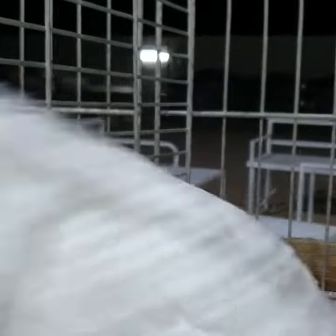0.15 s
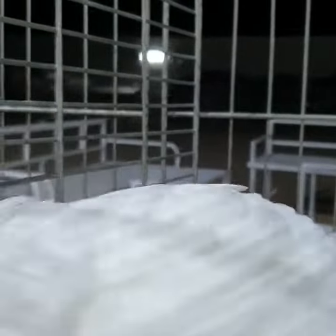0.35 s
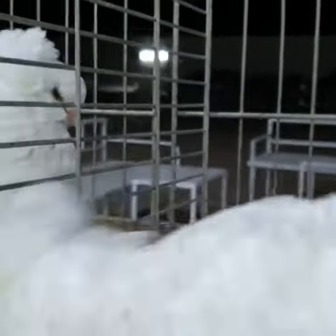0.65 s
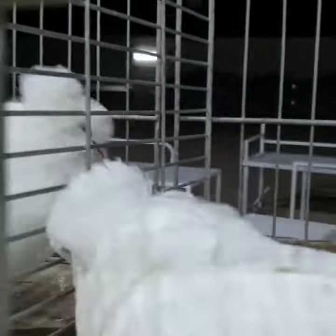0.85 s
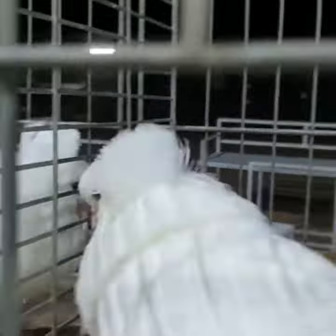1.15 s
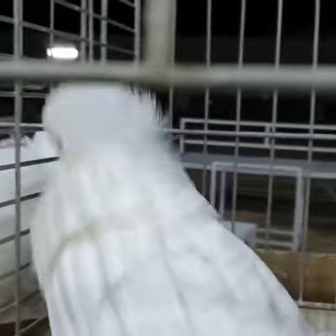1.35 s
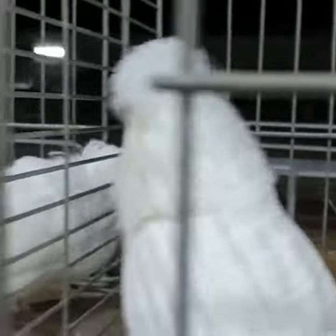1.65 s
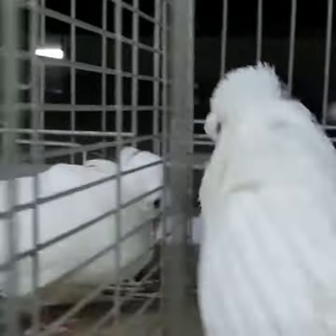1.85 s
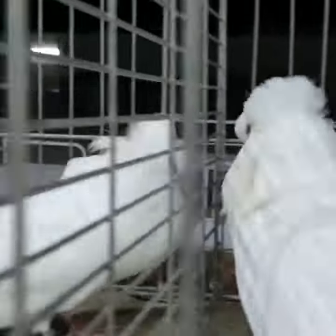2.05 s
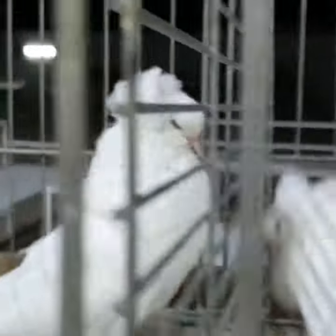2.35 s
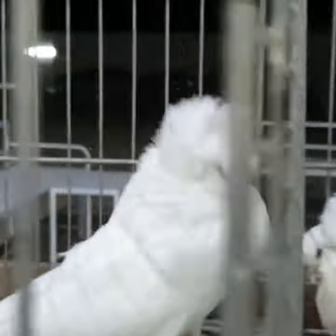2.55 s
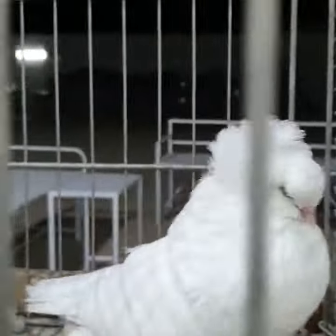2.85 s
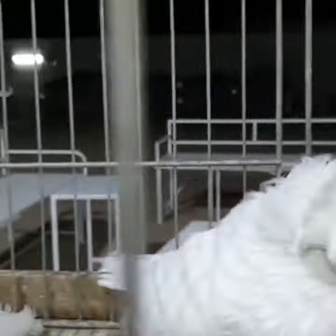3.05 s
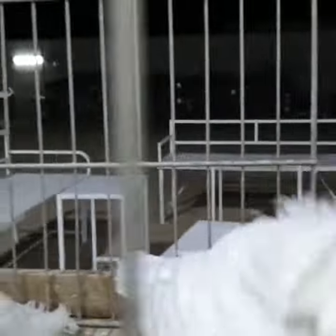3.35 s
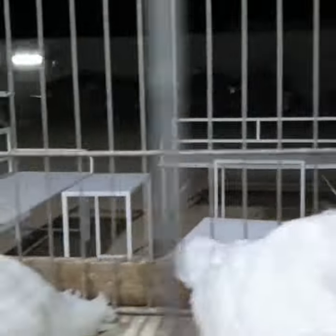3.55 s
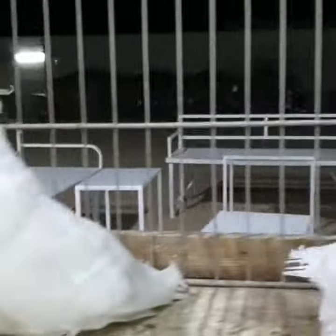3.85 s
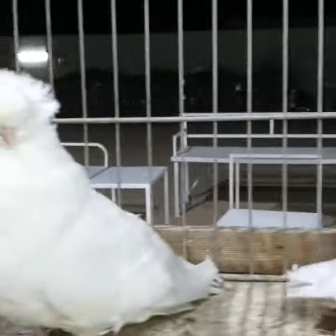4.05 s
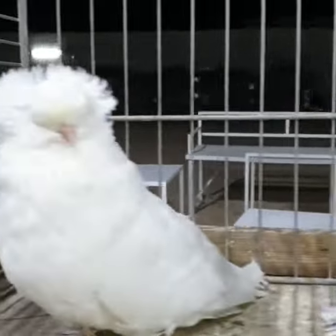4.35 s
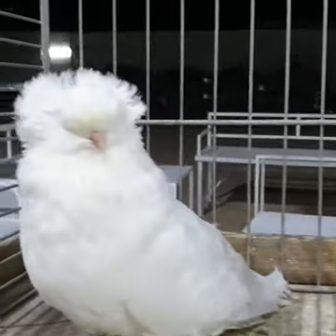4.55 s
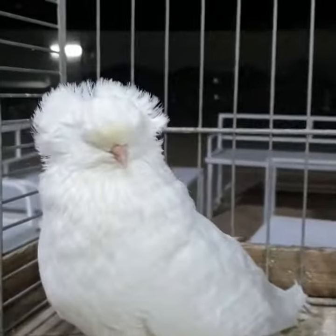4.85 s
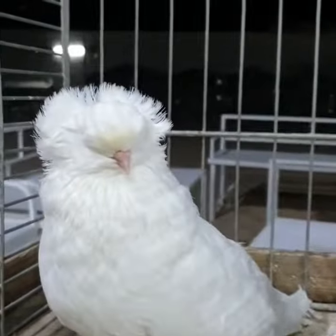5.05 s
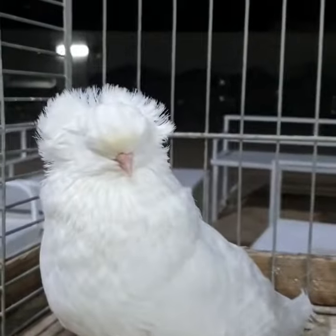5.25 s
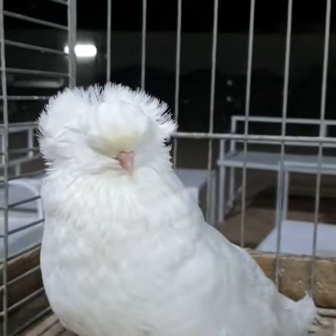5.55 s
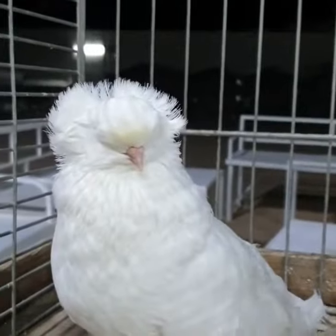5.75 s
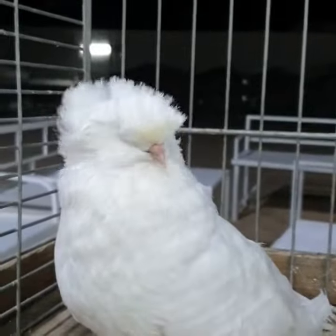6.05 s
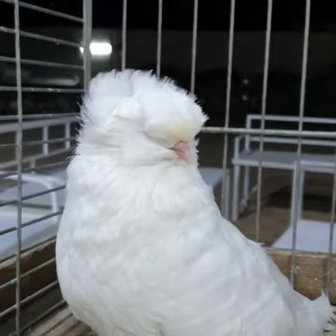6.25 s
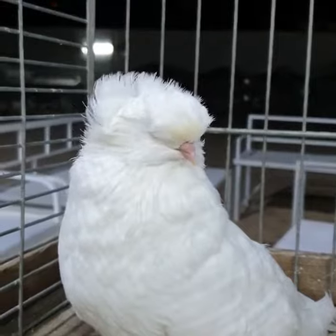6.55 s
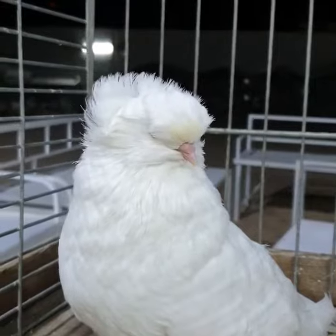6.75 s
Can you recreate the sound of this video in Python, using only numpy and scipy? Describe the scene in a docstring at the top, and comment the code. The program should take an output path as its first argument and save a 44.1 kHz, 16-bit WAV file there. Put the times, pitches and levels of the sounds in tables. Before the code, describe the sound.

Deep, bubbling pigeon coos climb and sag close by with claw ticks on wire, before faint yelps and a distant rooster's crow in night air.

```python
"""A near pigeon's coo and the gulps of an inflated crop open a night in a wire cage, over a flock's murmur.
Coos are nearly pure tones whose partials the chest rings by pitch; gulps and clucks are short decaying tones.
Claws and feathers are bursts of filtered noise on the wire, crickets are noise pulsed through a resonance.
A far dog yelps in arched glides; two roosters call in stacks of partials, one shaped by its throat.
A two-port microphone hears level and phase differences, and a short yard reverberation follows the calls."""
import sys
import numpy as np
from scipy import signal
from scipy.fft import rfft, irfft, next_fast_len
from scipy.io import wavfile
from scipy.ndimage import uniform_filter1d, map_coordinates

SR = 44100
rng = np.random.default_rng(int(sys.argv[2]) if len(sys.argv) > 2 else 0)


def wav_record(signal):
    """Record a signal, one row per channel, as 16-bit PCM in the file named by sys.argv[1]."""
    frames = np.transpose(np.atleast_2d(signal))
    bounded = np.clip(frames, -1, 1)
    # unit amplitude maps onto the largest positive 16-bit level
    quanta = np.round(bounded * 32767).astype(np.int16)
    wavfile.write(sys.argv[1], SR, quanta)


N = 304290
PORTS = np.array([[.5], [-.5]])  # half of any difference goes to the left port, half to the right


def amp(db):
    """Decibel definition: level to amplitude ratio."""
    return 10 ** (np.asarray(db) / 20)


def unit(x):
    """Normalisation to a root mean square of 1."""
    return x / np.sqrt(np.mean(x ** 2) + 1e-20)


def along(points, hz):
    """Interpolation of (f/Hz, value) points on a logarithmic frequency axis."""
    f, v = np.transpose(points)
    return np.interp(np.log(hz + 1), np.log(f + 1), v)


def wobble(rate, n=N):
    """Slow random modulation: a smooth curve through `rate` random knots a second."""
    knots = rng.standard_normal(int(n * rate / SR) + 4)
    return map_coordinates(knots, [np.arange(n) * rate / SR])


def flutter(depth, rate, n):
    """Amplitude modulation: a random gain about 1."""
    return 1 + depth * wobble(rate, n)


def filtered(x, response):
    """Linear filtering: the spectrum is multiplied by a complex response of frequency."""
    m = next_fast_len(N + SR // 2)
    return irfft(rfft(x, m) * response(np.fft.rfftfreq(m, 1 / SR)), m)[..., :N]


def placed(x, pan_db, lag_s):
    """Level and arrival-time difference between the ports; the left hears x lag_s later."""
    return filtered(x * amp(pan_db * PORTS), lambda hz: np.exp(-2j * np.pi * hz * lag_s * PORTS))


def sung(tables, partials, jitter, shimmer_db, fade=0.0048):
    """Phase is the integral of pitch; each table (t/s, f/Hz, ...) is one call that `partials` voices."""
    out = np.zeros(N)
    for rows in tables:
        s, hz, *cols = np.transpose(rows)
        a, b = round(max(s[0], 0) * SR), min(round(s[-1] * SR), N)
        t = np.arange(a, b) / SR
        pitch = np.interp(t, s, hz)
        phase = 2 * np.pi * np.cumsum(pitch * (1 + jitter * wobble(69.24, b - a))) / SR
        edge = np.clip(np.minimum(t - t[0], t[-1] - t) / fade, 0, 1)
        wave = partials(t, phase, [pitch] + [np.interp(t, s, c) for c in cols])
        shimmer = amp(shimmer_db * wobble(47.0, b - a))
        out[a:b] += np.sqrt(2) * edge * shimmer * wave
    return out


def pure(t, phase, cols):
    """Simple harmonic tone: a single partial."""
    return amp(cols[1]) * np.sin(phase)


def tone(t, phase, cols):
    """Near-sinusoid: a far call keeps little but its main partial."""
    return amp(cols[1]) * (np.sin(phase) + amp(-27.5) * np.sin(2 * phase))


def blips(events, t60, shut, attack, sag, octave):
    """Damped oscillation: notes (t/s, level/dB, f/Hz) swell, sag in pitch, decay and are shut off."""
    out, t = np.zeros(N + SR), np.arange(SR // 4) / SR
    swell = (1 - np.exp(-t / attack)) ** 2
    swell = swell * amp(-60 * t / max(t60, .01)) * np.exp(-(t / shut) ** 4)
    swell = swell / swell.max()
    for s, db, hz in events:
        phase = 2 * np.pi * hz * (t - sag * t * t)
        note = np.sin(phase) + octave * np.sin(2 * phase)
        out[round(s * SR):][:len(t)] += amp(db - 4.0) * swell * note
    return out[:N]


# likeness of the two ports in background noise: f/Hz, correlation (-1 to 1)
ALIKE = [(60, 0.82), (180, 0.9), (520, 0.87), (1510, -0.018), (4430, -0.03), (13000, -0.08)]


def rush(spectrum, patchy_db, tall, long):
    """Partly coherent stereo noise of rms 1, with patches of random gain, tall bins by long frames."""
    z = signal.stft(rng.standard_normal((2, N + 2048)), nperseg=1024)[2]
    field = uniform_filter1d(rng.standard_normal(z.shape[1:]), size=tall, axis=0)
    field = uniform_filter1d(field, size=long, axis=1)
    pair = signal.istft(z * amp(patchy_db * unit(field)), nperseg=1024)[1][:, :N]

    def mid_and_side(hz):
        turn = np.arccos(np.clip(along(ALIKE, hz), -1, 1)) / 2
        return amp(along(spectrum, hz)) * np.array([np.cos(turn), np.sin(turn)])

    mid, side = filtered(pair, mid_and_side)
    return unit(np.array([mid + side, mid - side]))


# cricket strength: t/s, level/dB
CRICKETS = [(0, -70), (1.2, -64.5), (2.6, -65.5), (4.3, -72), (4.7, -75), (6.9, -66)]


def crickets():
    """Resonant radiation: noise pulsed 12.87 times a second rings through a 7350 Hz wing resonance."""
    t = np.arange(N) / SR
    beat = 2 * np.pi * 12.87 * (t - 1.598)
    chirp = np.exp(1.4 * np.cos(beat)) * (1 + 0.8 * np.cos(4 * beat))  # a few wing strokes in each chirp

    def wing(hz):
        return 1j * hz * 600 / (7350 ** 2 - hz * hz + 1j * hz * 600)  # 600 Hz wide

    trill = filtered(unit(chirp) * rng.standard_normal((2, N)), lambda hz: wing(hz) ** 2)
    return amp(np.interp(t, *np.transpose(CRICKETS))) * unit(trill)


# strength of flock and rustle: t/s, murmur level/dB, rustle level/dB
NIGHT = [(0.0, -36, -52.5), (0.4, -44.5, -50), (1.321, -39.5, -59.5), (1.59, -39.5, -60), (1.799, -55, -58),
         (2.15, -50, -50.5), (2.3, -43, -58.5), (2.68, -37.5, -58.5), (3.321, -47, -58.5),
         (3.8, -51.5, -58), (5.01, -53, -61), (6.13, -45, -56.5), (6.9, -47, -56.5)]
# strength of the breeze: t/s, level/dB
BREEZE = [(0, -54), (1.3, -54), (1.7, -60.5), (2.67, -52.5), (3.6, -58), (4.2, -63), (5.0, -66.5),
          (5.7, -57), (6.3, -56), (6.9, -56)]
# noise spectra of flock, straw and feathers, and breeze: f/Hz, relative level/dB
MURMUR = [(76, -62.5), (130, -18.5), (237, -3.5), (307, -2.5), (355, -1), (490, -8.5), (581, -15.5),
          (900, -40.5), (1170, -44), (1980, -120)]
RUSTLE = [(410, -9.5), (700, -4), (919, -10), (1450, -12), (1900, -10.5), (3280, -23), (3620, -21),
          (5060, -23.5), (7420, -16), (8290, -24.5), (11100, -25), (12900, -35.5), (13400, -50.5)]
RUMBLE = [(15, -43), (25, -36), (49, 0), (107, -4.5), (134, -6.5), (150, -6), (200, -4.5), (330, -120)]
# balance of the whole background: f/Hz, left-right level/dB
LEAN = [(60, -0.5), (180, -2), (520, 0.5), (1510, -9), (4430, 8.5), (13000, -5)]


def night():
    """Superposed random noise: flock murmur, rustling straw and feathers, low breeze; then crickets."""
    s, *cols = np.transpose(NIGHT)
    t = np.arange(N) / SR
    murmur_db, rustle_db = [np.interp(t, s, c) for c in cols]
    rustle_db = rustle_db + 2 * wobble(8) + 1.5 * wobble(60)
    breeze_db = np.interp(t, *np.transpose(BREEZE))
    murmur = amp(murmur_db) * rush(MURMUR, patchy_db=5, tall=2, long=9)
    rustle = amp(rustle_db) * rush(RUSTLE, patchy_db=3.5, tall=5, long=4)
    breeze = amp(breeze_db) * rush(RUMBLE, patchy_db=1.5, tall=3, long=4)
    return filtered(murmur + rustle + breeze + crickets(), lambda hz: amp(along(LEAN, hz) * PORTS))


# reverberation time of the yard: f/Hz, t60/s
YARD = [(200, 0.06), (2000, 0.19), (10000, 0.018)]


def yard(x):
    """Reverberation: convolution with a noise tail in which each frequency decays at its own rate."""
    hz, t, z = signal.stft(rng.standard_normal((2, SR // 2)), SR, nperseg=256)
    tail = signal.istft(z * amp(-60 * t / along(YARD, hz)[:, None]), SR, nperseg=256)[1]
    tail[1] = 2.58 * tail[0] + 0.23 * tail[1]  # right: stronger, and much like the left
    tail = tail / np.linalg.norm(tail[0])
    late = np.pad(x, (500, 0))  # samples before the answer
    return signal.fftconvolve(late[None], tail, axes=1)[:, :N]


# dog yelps: t/s, length/s, top f/Hz, arch of the pitch (scales the bend), level/dB
YELPS = [(2.956, 0.11, 1061, 0.52, -42), (3.699, 0.1, 1048, .15, -47.5), (4.411, 0.15, 1102, 0.87, -44),
         (5.363, 0.17, 1110, 1.18, -45), (6.287, 0.15, 1118, 1.1, -45.5)]


def yelps():
    """Frequency glide: each yelp arches up in pitch and strength, then drops away."""
    # share of length, pitch bend, level/dB
    arch = [(0, -0.045, -21), (.15, -.03, -9.5), (.42, 0.0083, -5.5),
            (.65, -0.028, -0.5), (.75, -.06, -10), (1, -0.099, -16)]
    calls = []
    for s, length, hz, bend, db in YELPS:
        calls.append([(s + u * length, hz * (1 + bend * k), db + d) for u, k, d in arch])
    return sung(calls, pure, jitter=0.0041, shimmer_db=0.0)


# levels of partials 4 and 5 relative to the 3rd: level/dB
CRY_UPPER_DB = (-6, -17)


def cry(t, phase, cols):
    """Harmonic series roughened by phase noise: partials 2 to 6 waver and die away at 150 dB/s."""
    _, second, third, sixth = cols
    levels = [second, third] + [third + db for db in CRY_UPPER_DB] + [sixth]
    phase = phase + 0.6 * wobble(90, len(t)) + .5 * wobble(40, len(t))
    stack = sum(amp(db) * flutter(.6, 150, len(t)) * np.sin(k * phase) for k, db in enumerate(levels, 2))
    return amp(-150 * (t - t[0])) * stack


# cries of a second rooster further off: t/s, f/Hz, starting level/dB of partials 2, 3 and 6
CRIES = [(.01, 741, -57, -60, -75), (.752, 792, -64, -54, -78), (.925, 790, -68, -52, -68),
         (1.088, 747.6, -46, -59, -62)]
CRY_S = .045


def cries():
    """Short transient: each cry holds its pitch while it fades in and decays."""
    calls = [[(s, *row), (s + CRY_S, *row)] for s, *row in CRIES]
    return sung(calls, cry, jitter=0.0091, shimmer_db=0.0, fade=0.018)


# roughness of the crow: t/s, hoarseness
HOARSE = [(5.7, .7), (5.95, 1.0), (6.17, .8), (6.24, .2), (6.9, .1)]
# resonances of the rooster's throat: f/Hz, level/dB
THROAT = [(700, -11), (820, -16.5), (860, -8), (1400, -19), (1510, -24.5), (1600, -4.5), (1730, -10),
          (2050, 5.5), (2250, 6), (2420, -4), (2540, -8.5), (2900, -39), (3250, -14), (3700, -58),
          (4100, -25), (4800, -52), (5800, -27.5), (6500, -26.5), (7400, -30)]
RASP_HZ, RASP_DB = 2290, -3  # a hoarse crow hisses in the throat's main resonance
FULL_DB = -42  # partials 7 to 9 follow effort half as fast as the rest, about this effort
BREAK_S, BREAK_HALF_S = 6.365, .03  # at the top of the long note the 3rd partial drops out


def crow(t, phase, cols):
    """Source and filter: the throat weights nine partials; hoarseness shakes their phase and strength."""
    hz, effort_db = cols
    n = len(t)
    hoarse = np.interp(t, *np.transpose(HOARSE))
    gap_db = -28 * np.exp(-((t - BREAK_S) / BREAK_HALF_S) ** 4)
    phase = phase + hoarse * (.4 * wobble(130, n) + 1.2 * wobble(35, n))
    wave = amp(RASP_DB) * hoarse * wobble(311, n) * np.sin(2 * np.pi * RASP_HZ * t)
    for k in range(1, 10):
        db = along(THROAT, k * hz) + (k == 3) * gap_db + (k > 6) * (FULL_DB - effort_db) / 2
        wave = wave + amp(db) * flutter(.8 * hoarse, 150, n) * np.sin(k * phase)
    return amp(effort_db) * wave


# rooster crow, one table a syllable: t/s, f/Hz, effort level/dB
CROW = [
    [(5.705, 709, -59.5), (5.74, 726, -51), (5.77, 744, -65), (5.85, 774, -59), (5.885, 730, -67),
     (5.94, 717, -87)],
    [(5.95, 754, -54), (5.985, 789, -46), (6.018, 762, -55)],
    [(6.02, 835, -52), (6.045, 870, -46), (6.062, 785.5, -46.5), (6.092, 760, -53)],
    [(6.095, 769, -59.5), (6.165, 894, -47.5), (6.19, 860, -45)],
    [(6.195, 786, -49.5), (6.232, 811.4, -41.5), (6.33, 830, -44.5), (6.36, 830, -40), (6.39, 798, -44.5),
     (6.444, 810.3, -43), (6.524, 783, -48.5), (6.545, 760, -43.5), (6.604, 747, -42.5),
     (6.664, 741, -46.5), (6.706, 771, -58.5), (6.77, 731, -50.5), (6.8, 752, -60), (6.855, 722, -44.5),
     (6.9, 692, -52)],
]
# thin high overtones as the crow sets in: t/s, length/s, f/Hz, level/dB
OVERTONES = [(5.655, 0.07, 4650, -64), (5.73, 0.051, 3785, -68), (5.741, 0.12, 6160, -67)]


def rooster():
    """Superposition: the crow's harmonic syllables and thin high overtones at its onset."""
    thin = [[(s, hz, db), (s + length, hz, db)] for s, length, hz, db in OVERTONES]
    syllables = sung(CROW, crow, jitter=.003, shimmer_db=1.5)
    return syllables + sung(thin, pure, jitter=.009, shimmer_db=4, fade=.02)


# how the crow reaches the two ports: f/Hz, left-right level/dB, left leads/rad
CROW_PORTS = [(800, -1, 0), (1600, -8, .5), (2230, -10, 2.3), (2440, -9.5, 3.9), (3250, -1, 1),
              (4000, 8, .2), (5700, 7, 0), (6500, 3, .3)]


def at_ports(x):
    """Interference: the crow's balance and phase between the ports change with frequency."""
    pan, lead = [[(row[0], row[k]) for row in CROW_PORTS] for k in (1, 2)]
    return filtered(x, lambda hz: amp(along(pan, hz) * PORTS) * np.exp(1j * along(lead, hz) * PORTS))


# coos of birds further off: t/s, length/s, first f/Hz, last f/Hz, level/dB
COOS_FAR = [(3.7, 0.19, 480, 460, -52), (4.239, 0.16, 350, 361, -53), (4.348, 0.39, 400, 485.2, -58),
            (5.55, 0.18, 480, 477, -54), (6.5, 0.12, 440, 492, -51.5), (4.724, 0.69, 362.2, 355.3, -58),
            (5.326, 0.4, 266, 331.5, -49.5), (5.76, 0.389, 300, 252.5, -48), (6.25, 0.394, 360, 362, -50.5),
            (5.17, 0.55, 162, 172.3, -64.5), (5.7, 0.4, 188.7, 181.3, -55),
            (6.19, 0.089, 182.6, 184, -38.5)]


def far_coos():
    """Linear frequency glide: each far coo slides from its first pitch to its last."""
    glides = [[(s, first, db), (s + length, last, db)] for s, length, first, last, db in COOS_FAR]
    return sung(glides, tone, jitter=.027, shimmer_db=3, fade=.05)


# short higher clucks from other cages: t/s, relative level/dB, f/Hz
CLUCKS = [(0.33, -37, 608), (0.605, -36.5, 387), (0.659, -30.5, 660), (0.774, -35, 573), (1.262, -29, 655),
          (2.2, -39, 674), (2.46, -34.5, 625), (2.49, -37.5, 631), (2.61, -30, 450), (2.533, -40.5, 600),
          (2.65, -39.5, 660), (2.836, -36, 576), (3.832, -42, 716), (5.295, -48, 591), (5.329, -42, 716)]
CLUCK_T60_S, CLUCK_SHUT_S = 0.12, .024


def clucks():
    """Damped oscillation cut short: each cluck starts fast and is shut off."""
    return blips(CLUCKS, CLUCK_T60_S, CLUCK_SHUT_S, attack=0.00097, sag=0.9, octave=0.032)


# claws and feathers on the wire: t/s, relative level/dB, 1-3 kHz body relative level/dB, left-right level/dB
TICKS = [(0.0631, -26.5, -3, 2.5), (0.1484, -40, -21, 2.5), (0.173, -38.5, -12, 2.5), (0.256, -39.5, 2, -8),
         (0.364, -45.5, -14, -2), (0.878, -45.5, 3.5, -3), (0.619, -43.5, -2.5, -18.5),
         (0.8075, -42, 3, -1), (0.9256, -35.5, 5, -4.5), (0.9698, -38, 0, 1), (1.0216, -44, -4, 1),
         (1.082, -41, 1, -0.5), (1.2476, -42, -10, -1.5), (1.3079, -52.5, -11, -9.5),
         (1.825, -44, -11.5, 3), (2.062, -46, 0, -8), (2.097, -42, -3, 6.5), (2.125, -40.5, -1.5, -9),
         (2.363, -45.5, -11, -3), (2.435, -36.5, 1, -5.5), (2.4787, -40.5, 7, -3), (2.529, -43.5, 2.5, -6),
         (3.034, -44, 1.5, -8.5), (3.066, -50, 10, -4.5), (3.1078, -49, 10.5, -1.5),
         (3.1802, -38, -21.5, -6.5), (3.236, -35, 1.5, -8), (3.525, -45, 6.5, -9.5), (3.87, -50.5, 3, 0.5),
         (3.996, -46.5, 6.5, -3.5), (4.6698, -48, 3, -1), (5.8504, -39, -21, -3), (5.964, -43, -14, 0.5),
         (6.2626, -37.5, 3, 5)]
BRUSH_T60_S, BRUSH_FROM_DB = 0.054, -36  # brush decay time at this table level
SHARPER_PER_DB = 0.3  # louder contacts are sharper: their brush is shorter
LONGEST_BRUSH_S, BRUSH_FLICKER_DB = .2, 2.2


def ticks():
    """Impact and friction noise: a bright, sharp contact, then a duller scratchy brush that dies away."""
    out, t = np.zeros((2, N + SR)), np.arange(SR // 5) / SR
    sharp, high, body = [signal.butter(2, band, "band", fs=SR, output="sos")
                         for band in ([4500, 11500], [3000, 10000], [1100, 2800])]  # Hz
    contact = (1 - np.exp(-t / .002)) * amp(-60 * t / .03)
    for s, db, body_db, pan_db in TICKS:
        t60 = BRUSH_T60_S * np.exp(-SHARPER_PER_DB * (db - BRUSH_FROM_DB))
        t60 = np.clip(t60, .01, LONGEST_BRUSH_S)
        noise = rng.standard_normal((2, len(t))) * amp(3.0 * wobble(364, len(t)))  # scratchy grains
        brush = (1 - np.exp(-t / 0.028)) * amp(-60 * t / t60 + BRUSH_FLICKER_DB * wobble(90, len(t)))
        burst = signal.sosfilt(sharp, noise * 0.73 * contact)
        burst += signal.sosfilt(high, noise * 0.64 * brush)
        burst += amp(body_db + 6.5) * signal.sosfilt(body, noise * (brush + 0.25 * contact))
        out[:, round((s - .001) * SR):][:, :len(t)] += amp(db + 2.0) * burst * amp(pan_db * PORTS)
    return out[:, :N]


# gulps of the inflated crop: t/s, relative level/dB, f/Hz
GULPS = [(0.002, -16, 257), (0.55, -28, 280), (0.589, -20, 247), (0.653, -26, 324), (0.766, -19.5, 279),
         (0.842, -13.5, 323), (0.933, -10.5, 355), (1.429, -22.5, 286), (1.485, -16.5, 314),
         (1.573, -12.5, 331), (1.84, -18.5, 369), (1.863, -21, 318), (2.118, -27, 341), (2.196, -24.5, 237),
         (2.59, -17, 270), (2.755, -15, 261), (2.779, -14.5, 306), (2.82, -15, 304), (2.917, -10, 320),
         (2.949, -18.5, 264), (2.999, -14, 280), (3.058, -11, 310), (3.361, -10.5, 352), (3.413, -14, 300),
         (3.443, -10, 336), (3.465, -10, 287), (3.661, -17.5, 248)]
GULP_T60_S, SHUT_S = 0.062, 0.032  # a gulp is cut off as the throat shuts


def gulps():
    """Cavity resonance: each gulp rings the air sac as a damped oscillation."""
    return blips(GULPS, GULP_T60_S, SHUT_S, attack=0.0032, sag=1.0, octave=0.048)


# chest response to the main partial, the octave and the partials above: pitch f/Hz, level/dB
CHEST = [(165, -4), (190, -15.5), (235, -9.5), (290, -2), (340, -1), (460, -4.5), (550, -19)]
OCTAVE = [(165, -19), (190, -10.5), (230, -8), (290, -14.5), (340, -27), (460, -33.5), (550, -49.5)]
UPPER = [(200, -47), (240, -35.5), (290, -38), (340, -41.5), (460, -62)]
# mix of partials 3 to 5: relative level/dB
UPPER_MIX_DB = (-2, -7, -14)
GLIDE_DULL_DB = -2  # overtones lost per kHz/s of glide


def coo(t, phase, cols):
    """Resonance of chest and air sac: a near-pure tone, its octave and weak upper partials."""
    hz, effort_db, octave_db, upper_db, rasp = cols
    n = len(t)
    glide = uniform_filter1d(np.abs(np.gradient(hz, t)) / 1000, size=600)  # kHz/s
    dull_db = GLIDE_DULL_DB * glide
    main_db = effort_db + along(CHEST, hz)
    octave_db = effort_db + octave_db + dull_db + along(OCTAVE, hz)
    upper_db = effort_db + upper_db + dull_db + along(UPPER, hz)
    sac = amp(-3.5) * wobble(100, n) * np.sin(2 * np.pi * 325 * t)  # stirred by a strong octave
    grain = amp(-17) * wobble(160, n) * np.sin(2 * np.pi * 300 * t)  # throat noise
    main = flutter(rasp, 80, n) * np.sin(phase) + grain
    octave = flutter(.25 + rasp, 80, n) * np.sin(2 * phase + 1) + sac
    upper = sum(amp(d) * flutter(.8, 80, n) * np.sin(k * phase) for k, d in enumerate(UPPER_MIX_DB, 3))
    return amp(main_db) * main + amp(octave_db) * octave + amp(upper_db) * upper


# coos of the near birds; a full coo climbs, holds, breaks to the chest and sags:
# effort level/dB, octave relative level/dB, upper partials relative level/dB, rasp (0-1), [(t/s, f/Hz)]
COOS = [ (-24, 1.5, 3, 0.025, [(0, 258), (.04, 236.6), (.2, 216), (.235, 178)]),
        (-24, -8, 19.5, 0.34, [(.32, 200.6), (.40, 178.8), (.45, 217), (.53, 190)]),
        (-34.5, -1, 14.5, 0.25, [(.71, 208.7), (.78, 251.6), (.845, 292)]),
        (-25, 4.5, 8, 0.053, [(.85, 331), (.875, 377), (.93, 402.3), (.96, 297)]),
        (-24.5, 2.5, 9.5, 0.058, [(.99, 250), (1.045, 433.5), (1.11, 434.7), (1.15, 459.4), (1.335, 461.3),
        (1.355, 333), (1.42, 286.5), (1.51, 231.1)]), (-31.5, -4, -6, .1, [(1.5, 410), (1.575, 524)]),
        (-26.5, 2, 2, 0.18, [(1.59, 492), (1.67, 600.6), (1.73, 540), (1.77, 577), (1.81, 547.5),
        (1.88, 295), (1.92, 245), (2.1, 216.2), (2.15, 196)]), (-30.5, -19, 0, 0.27, [(2.185, 245),
        (2.27, 211.2)]), (-40.5, -2, -5, 0.34, [(2.34, 268), (2.4, 381.4), (2.46, 436.3), (2.57, 414)]),
        (-37, -5, -4, 0.19, [(2.45, 260), (2.52, 293), (2.59, 313)]), (-36, -6, 2, .4, [(2.61, 293),
        (2.66, 274.7), (2.72, 280)]), (-34.5, -4.5, 0, 0.3, [(2.665, 385), (2.7, 386), (2.735, 320)]),
        (-26.5, -0.5, -12, 0.15, [(2.79, 287.4), (2.905, 376.4), (2.94, 293)]),
        (-28.5, 5, -3, 0.044, [(2.98, 287.7), (3.05, 404.7), (3.16, 458), (3.25, 469), (3.36, 499)]),
        (-22, -1.5, 3, 0.17, [(3.09, 504.6), (3.14, 530), (3.36, 545), (3.42, 319.6), (3.49, 256.6),
        (3.53, 237.2), (3.64, 220.7), (3.68, 245.6), (3.72, 161)]), (-46, -15, -10, 0.13, [(3.96, 371),
        (4.01, 332), (4.2, 330.6), (4.235, 278), (4.3, 138.3)]), ]
COO_FADE_S = 0.017


def near_coos():
    """Frequency modulation: each near coo follows its pitch contour with one voice setting."""
    calls = [[(s, hz, *voice) for s, hz in pitch] for *voice, pitch in COOS]
    return sung(calls, coo, jitter=.007, shimmer_db=.6, fade=COO_FADE_S)


def scene():
    """Superposition of direct sound at the ports, yard reverberation and background."""
    far = far_coos() + clucks()
    dog, second_rooster, first_rooster = yelps(), cries(), rooster()
    pair = near_coos() + gulps()
    near = placed(pair, pan_db=1.1, lag_s=.00001)
    distant = placed(far, pan_db=2.5, lag_s=.00003)
    distant = distant + placed(dog + second_rooster, pan_db=-4.5, lag_s=.0001)
    distant = distant + at_ports(first_rooster)
    sends = amp(-20.0) * pair + amp(-5.5) * far + amp(-13.0) * dog
    sends = sends + amp(-6.0) * second_rooster + amp(-21) * first_rooster
    return night() + yard(sends) + distant + ticks() + near


def record(dry):
    """Band limitation: nothing at or above 13580 Hz is kept."""
    return filtered(dry, lambda hz: hz < 13580)


dry = scene()
out = record(dry)
wav_record(out)
```